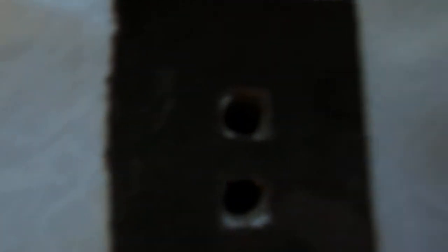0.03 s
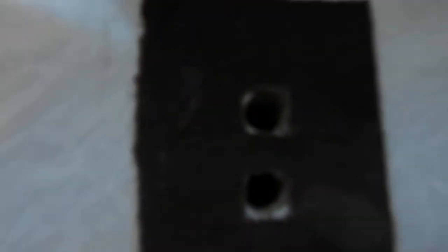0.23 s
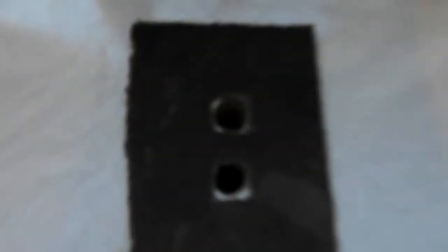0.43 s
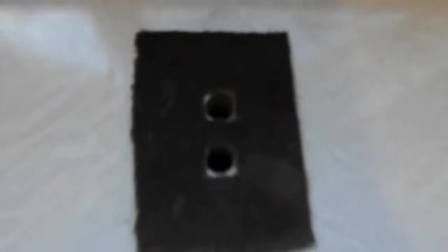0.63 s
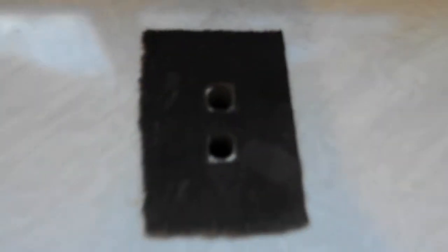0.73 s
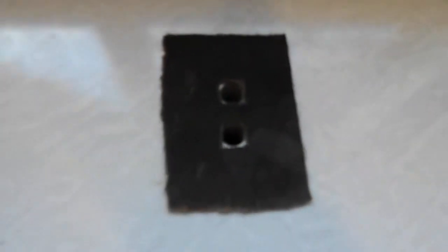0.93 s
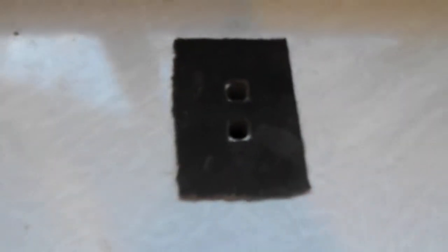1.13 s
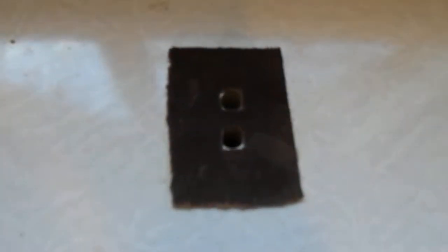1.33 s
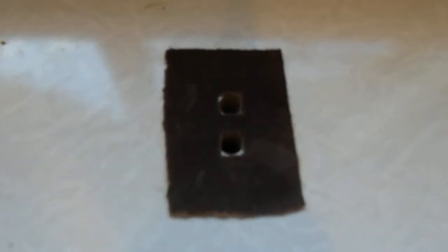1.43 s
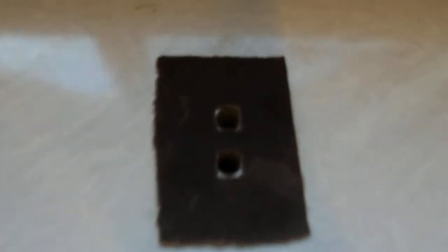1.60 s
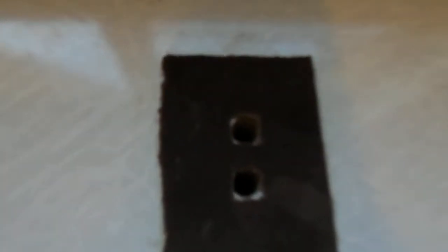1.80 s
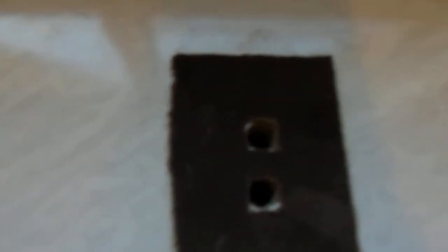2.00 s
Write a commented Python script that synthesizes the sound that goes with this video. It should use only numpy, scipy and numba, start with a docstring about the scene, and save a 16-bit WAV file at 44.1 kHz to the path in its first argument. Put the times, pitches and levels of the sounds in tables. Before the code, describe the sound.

Air from a foot-worked bellows hisses, then buffets the microphone in rumbling gusts, then hisses again

```python
"""A workshop, close to the outlet holes of a foot-worked bellows, heard by a two-port microphone.
Air hisses through the holes as flickering bands of noise; the wooden chest rumbles and rings with knocks.
The jet sweeps from the left port to the right, buffeting each on its own with gusts, eddies and crackles.
Then a valve pops open with a puff of ringing noise, the hiss returns, and short wavering tones hoot."""
import sys
import numpy as np
from scipy import signal
from scipy.fft import rfft, irfft
from scipy.io import wavfile
from scipy.ndimage import uniform_filter1d
from numba import njit

SR = 44100
rng = np.random.default_rng(int(sys.argv[2]) if len(sys.argv) > 2 else 0)


def waveform_to_disk(signal):
    """Save audio, clipped to [-1, 1], as 16-bit WAV at the path in sys.argv[1]."""
    frames = np.transpose(np.atleast_2d(signal))
    scaled = np.clip(frames, -1, 1) * 32767
    samples = np.round(scaled).astype(np.int16)
    wavfile.write(sys.argv[1], SR, samples)


def gain_from_decibels(decibels):
    """Convert decibel values to linear amplitude factors."""
    exponent = np.asarray(decibels, float) / 20
    return 10 ** exponent


N = 90625

# spectrum of air noise at the holes, for hiss and valve: pitch_hz, density_db (relative, per Hz)
AIR_COLOUR = [(700, -10), (1100, -5), (1700, -4.5), (2400, -3.5), (3300, -7), (4000, -8), (4500, -5.5),
              (5200, -9.5), (6300, -1.5), (6900, -3.5), (7900, -3), (9500, -7), (11000, -6.5), (13000, -9),
              (15900, -8.5), (16200, -49)]
MIC_LOW_HZ = 260  # upper of the microphone's two bass cuts


def column(table, k, t):
    """Column k of a curve at times t."""
    return np.interp(t, [row[0] for row in table], [row[k] for row in table])


def spectrum(table, hz):
    """A spectrum table read on a log-frequency axis."""
    return column([(np.log(f), value) for f, value in table], 1, np.log(hz))


def unit(x):
    """Scale to rms 1."""
    return x / np.sqrt(np.mean(x ** 2))


def walk(rate):
    """Random levels held 1 / rate s and slewed twice; spread 1."""
    hold = max(int(SR / rate), 2)
    steps = np.repeat(rng.standard_normal(N // hold + 1), hold)
    smooth = uniform_filter1d(uniform_filter1d(steps, hold), hold)
    return unit(smooth[:N])


def band(low_hz, high_hz, colour):
    """Noise between two frequencies with soft edges, shaped by a spectrum and the holes."""
    # narrow resonances of the holes: pitch_hz, boost_db
    hole_peaks = [(13600, 7.7), (2370, 1.5), (4470, 3.1), (11430, 4.5)]
    hole_q = 48
    f = np.maximum(np.arange(N // 2 + 1) * SR / N, 1)
    place = np.log(f / np.sqrt(low_hz * high_hz)) / np.log(high_hz / low_hz)
    edge = np.cos(np.clip(place, -.5, .5) * np.pi)
    holes_db = sum(db / (1 + (2 * hole_q * (f / hz - 1)) ** 2) for hz, db in hole_peaks)
    return irfft(rfft(rng.standard_normal(N)) * edge * gain_from_decibels(spectrum(colour, f) + holes_db), N)


@njit
def lowpass(x, hz, damping):
    """State-variable low-pass whose corner moves every sample."""
    y, band_state, low_state = np.empty(len(x)), 0., 0.
    for i in range(len(x)):
        g = np.tan(np.pi * hz[i] / SR)
        v = (band_state + g * (x[i] - low_state)) / (1 + g * (g + damping))
        y[i] = low_state + g * v
        band_state, low_state = 2 * v - band_state, 2 * y[i] - low_state
    return y


def flow_noise(colour, centres, flicker_db):
    """Overlapping octave bands that flicker alone and swell together, partly alike left and right."""
    # likeness of left and right: pitch_hz, correlation (0-1)
    likeness = [(300, 0.8), (1400, 0.92), (3100, 0.65), (5300, 0.44), (7000, 0.58)]
    # stereo lean: pitch_hz, left_minus_right_db
    balance = [(250, 1.5), (1300, 0), (8000, -3), (15000, 4)]
    swell_db = 0.81 * walk(22.6)
    bands = []
    for hz in centres:
        alike = np.clip(spectrum(likeness, hz), 0, 1)
        mid, side = (band(hz / 2 ** .5, hz * 2 ** .5, colour) for _ in range(2))
        pair = np.sqrt(1 + alike) * mid + np.sqrt(1 - alike) * side * np.array([[1], [-1]])
        lean = gain_from_decibels(spectrum(balance, hz) * np.array([[.5], [-.5]]))
        bands.append(pair * lean * gain_from_decibels(flicker_db * walk(44.9) + swell_db))
    return np.array(bands)


def hiss(t):
    """Turbulent air at the holes: noise whose lower and upper parts follow separate levels."""
    # strokes of air: time_s, level_db (before the common lift), lower_part_db (against the upper part)
    strokes = [(0, -24, -6.5), (.03, -25.5, -5), (.12, -21.5, -2), (.19, -22.5, -4), (.25, -36.5, -5.5),
               (.308, -49, -0.5), (.316, -39.5, 10.5), (.36, -42.5, 5), (.46, -38, 1), (.6, -37, -0.5),
               (.75, -37.5, 1), (.79, -43, 0.5), (.9, -48.5, 6.5), (1.25, -47.5, -4.5), (1.46, -52.5, -1),
               (1.53, -64, 2), (1.62, -75, 5), (1.64, -52.5, -3), (1.71, -46, 3), (1.716, -22, -1.5),
               (1.732, -27, -2.5), (1.76, -28, 0), (1.87, -26.5, -4), (2.03, -20.5, -5), (2.054, -24, 0)]
    lift_db = 1.5
    centres = 700 * 2 ** (np.arange(10) / 2)  # Hz, half an octave apart
    bands = flow_noise(AIR_COLOUR, centres, flicker_db=1.56)
    low = unit(bands[:6].sum(axis=0))  # centres up to 4 kHz
    high = unit(bands[6:].sum(axis=0))
    return gain_from_decibels(column(strokes, 1, t) + lift_db) * (high + gain_from_decibels(column(strokes, 2, t)) * low)


def chest(t):
    """Lumpy rumble of the wooden chest, and dull knocks that ring its modes as decaying sines."""
    # rumble: time_s, level_db
    rumble_level = [(0, -35), (.05, -32.5), (.19, -31), (.308, -45), (.32, -31), (.65, -30), (.8, -33),
                    (1.15, -67), (1.6, -76), (1.69, -44), (1.718, -26), (1.78, -28.5), (1.87, -26),
                    (1.99, -33), (2.054, -29)]
    # rumble spectrum: pitch_hz, density_db (relative, per Hz)
    rumble_colour = [(50, -6), (200, -8), (300, -3), (450, -3), (650, -6.5), (900, -10.5), (1300, -5.5)]
    # knocks: start_s, level_db (before mode level and scatter), pitch_factor
    knocks = [(.338, -17.5, 0.96), (.359, -13, 0.98), (.419, -17, 0.73), (.494, -27, 1), (1.721, -18, 1.04),
              (1.803, -14, 1.097), (1.818, -15, 1.14), (1.832, -16, 1.43)]
    # ringing modes: pitch_hz (before knock factor and scatter), level_db (against the knock), t60_s
    modes = [(330, -6.5, 0.032), (453, 4, 0.043), (623, -5, 0.057), (1010, -18, 0.01)]
    attack_s, pitch_scatter, level_scatter_db = 0.001, 0.046, 2
    centres = 60 * 2 ** (np.arange(9) / 2)  # Hz
    rumble = unit(flow_noise(rumble_colour, centres, flicker_db=1.5).sum(axis=0))
    out = rumble * gain_from_decibels(column(rumble_level, 1, t))
    scatter = rng.uniform(-1.35, 1, (len(knocks), len(modes)))
    for (start, db, pitch), draws in zip(knocks, scatter):
        u = np.maximum(t - start, 0)
        for (hz, mode_db, t60), draw in zip(modes, draws):
            tone = np.sin(2 * np.pi * hz * pitch * (1 + pitch_scatter * draw) * u)
            ring = tone * np.exp(-np.log(1000) * u / t60)
            out = out + gain_from_decibels(db + mode_db + level_scatter_db * draw) * ring * (1 - np.exp(-u / attack_s))
    return out


def wind(t, steady, port):
    """Pressure eddies on one port: low-passed noise, brighter where it surges, with snaps and crackles."""
    # strongest eddies that strike a port: centre_s, peak_db (added as power), port (L or R)
    eddies = [(0.702, -7, "L"), (.731, -15, "L"), (0.765, -9, "L"), (0.782, -3.5, "L"), (0.828, -9.5, "L"),
              (.838, -8, "R"), (0.87, -8, "L"), (0.895, -4, "R"), (0.909, -8.5, "L"), (.927, -4, "R"),
              (0.974, -10, "R"), (0.975, -12.5, "L"), (1.022, -10.5, "R"), (1.043, -8.5, "R"),
              (1.051, -7.5, "L"), (1.114, -9, "R"), (1.212, -12, "R"), (1.261, -8.5, "R"), (1.286, -9, "R"),
              (1.346, -10, "R"), (1.36, -6.5, "R"), (1.4, -10, "R"), (1.427, -11, "R"), (1.465, -15, "R"),
              (1.485, -9, "R"), (1.496, -5.5, "R"), (1.53, -21.5, "R"), (1.55, -18, "R")]
    # sharp crackles as an eddy bursts on a port: centre_s, peak_db (noise rms), port (L or R)
    crackles = [(.784, -10, "L"), (.828, -13, "L"), (.866, -12, "L"), (.896, -12.5, "R"), (0.906, -22, "L"),
                (1.027, -16, "R"), (1.043, -14, "R"), (1.089, -16.5, "R"), (1.115, -19, "R"),
                (1.212, -19, "R"), (1.261, -23, "R"), (1.287, -22, "R"), (1.425, -31, "R")]
    eddy_s, crackle_s, crackle_top_hz = 0.0029, 0.0012, 2200
    gust_db, gust_per_s, bright_oct_per_db = 4, 150, 0.0669
    snap_s, snaps_per_s, snap_db_per_hz = .00012, 260, 0.0649

    blowing = (t > steady[0][0]) * (t < steady[-1][0])
    calm = gain_from_decibels(column(steady, 1, t)) ** 2 * blowing + 1e-14
    power = calm * gain_from_decibels(gust_db * walk(gust_per_s) + 0.87 * walk(39.82)) ** 2

    # snaps: random clicks of either sign, stronger where the steady wind is bright
    steady_top = column(steady, 2, t)
    sharp = gain_from_decibels(snap_db_per_hz * (steady_top - 595))
    chance, strength = rng.random((N, 2)).T
    hits = (chance < snaps_per_s / SR) * (2 * strength - 1) * np.sqrt(power)
    u = np.arange(-40, 41) / SR / snap_s
    snaps = np.convolve(hits * sharp, np.exp(-np.sqrt(u ** 2 + .7)), "same")

    for centre, db, side in eddies:
        if side == port:
            power = power + gain_from_decibels(db) ** 2 * np.exp(-((t - centre) / eddy_s) ** 2)

    # a surge above the steady level opens the low-pass
    surge_db = np.minimum(10 * np.log10(power / calm), 7)
    top = np.clip(steady_top * 2 ** (bright_oct_per_db * surge_db), 100, 8000)
    buffet = lowpass(lowpass(rng.standard_normal(N), top, 1.35), top * 1.99, 1.93)
    # level it by the part that lies above the microphone's bass cut
    audible = buffet - uniform_filter1d(buffet, int(SR / MIC_LOW_HZ / 2))
    buffet = buffet / np.sqrt(uniform_filter1d(audible ** 2, int(eddy_s * SR * 4)) + 1e-12)

    burst = sum(gain_from_decibels(db) * np.exp(-((t - centre) / crackle_s) ** 2)
                for centre, db, side in crackles if side == port)
    grit = unit(lowpass(rng.standard_normal(N), np.full(N, 1. * crackle_top_hz), 0.67))
    return buffet * np.sqrt(power) + burst * grit + snaps


def valve(t):
    """The valve pops open: a short decaying puff of noise through ringing bands."""
    # bands of the puff: centre_hz, half_width_hz, level_db
    puff_bands = [(3170, 280, -20), (4340, 1200, -21), (9970, 2100, -17)]
    start_s, attack_s, t60_s = 1.713, 0.006, 0.11
    u = np.maximum(t - start_s, 0)
    puff = sum(gain_from_decibels(db) * unit(band(hz - half, hz + half, AIR_COLOUR)) for hz, half, db in puff_bands)
    return puff * np.clip(u / attack_s, 0, 1) * np.exp(-np.log(1000) * u / t60_s)


def hoots(t):
    """Air catches the edge of a hole: short wavering sines that start softer and settle in pitch."""
    # hoots: start_s, length_s, first_hz, settled_hz, level_db (settled rms)
    tones = [(1.944, 0.034, 1110, 1066, -27), (2.013, 0.038, 812, 713, -11.5),
             (2.021, 0.044, 992, 980, -22)]
    edge_s, settle_s, waver_hz, waver_db = 0.0025, 0.006, 16, 1.0
    out = np.zeros(N)
    for start, length, first, hz, db in tones:
        envelope = np.clip(np.minimum(t - start, start + length - t) / edge_s, 0, 1)
        settling = np.exp(-np.maximum(t - start, 0) / settle_s)
        pitch = hz + (first - hz) * settling + waver_hz * walk(120)
        level = 2 ** .5 * gain_from_decibels(db - 6 * settling + waver_db * walk(150))
        out += envelope * level * np.sin(2 * np.pi * np.cumsum(pitch) / SR)
    return out


def scene():
    """Outlet and chest in front, wind on each port."""
    # steady buffeting of each port by the jet: time_s, level_db, top_hz (before surges raise it)
    left_jet = [(.68, -36, 400), (0.698, -14, 404), (.83, -12.5, 610), (.9, -15.5, 616), (1.07, -26, 384),
                (1.13, -31, 300.2), (1.18, -47, 240), (1.27, -36, 260), (1.34, -58, 226), (1.639, -48, 224)]
    right_jet = [(.66, -40, 298), (.78, -20.5, 372), (.89, -19.5, 540), (.95, -14, 630), (1.07, -8.5, 840),
                 (1.19, -14, 560), (1.25, -12, 570), (1.43, -22, 330), (1.49, -21.5, 330),
                 (1.55, -32.5, 274), (1.619, -39.5, 270), (1.67, -61, 276)]
    t = np.arange(N) / SR
    ports = np.array([wind(t, left_jet, "L"), wind(t, right_jet, "R")])
    return hiss(t) + chest(t) + ports + valve(t) + hoots(t)


def top_cut(x):
    """Nothing passes above the cut-off."""
    return signal.sosfilt(signal.butter(12, 17060, fs=SR, output="sos"), x)


def record(dry):
    """The microphone rounds the peaks by soft saturation, then cuts the bass twice."""
    x = np.tanh(dry)
    for hz in (MIC_LOW_HZ, 196):
        x = signal.sosfilt(signal.butter(2, hz, "high", fs=SR, output="sos"), x)
    return top_cut(np.clip(x, -1, 1))


dry = scene()
out = record(dry)
waveform_to_disk(out)
```